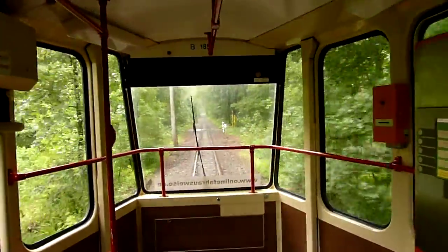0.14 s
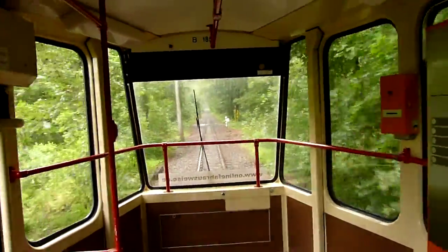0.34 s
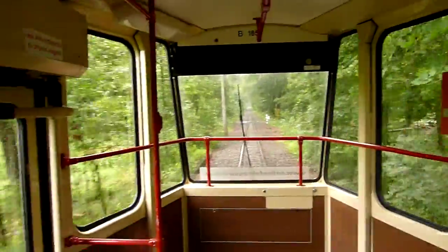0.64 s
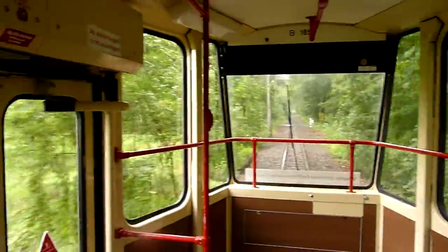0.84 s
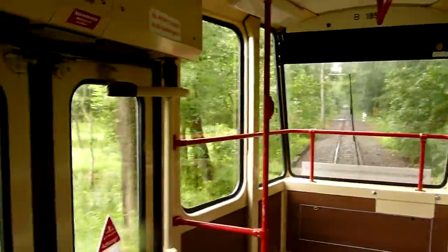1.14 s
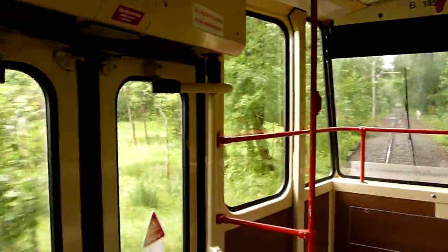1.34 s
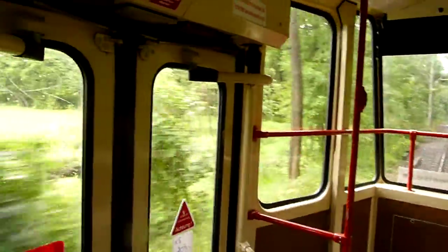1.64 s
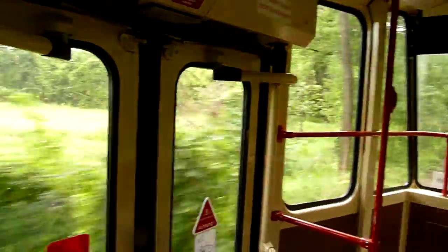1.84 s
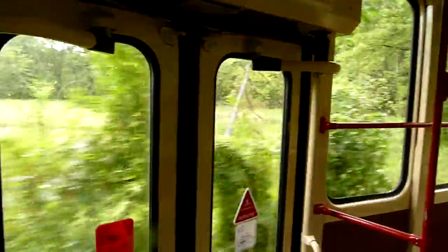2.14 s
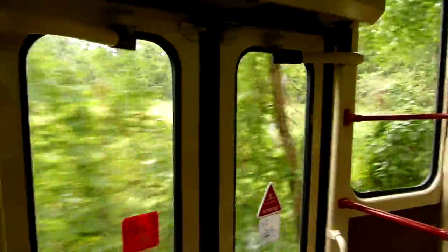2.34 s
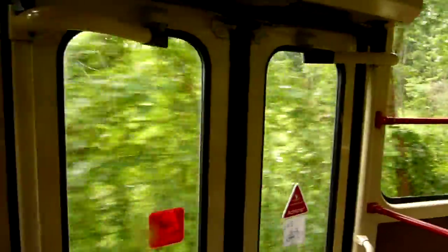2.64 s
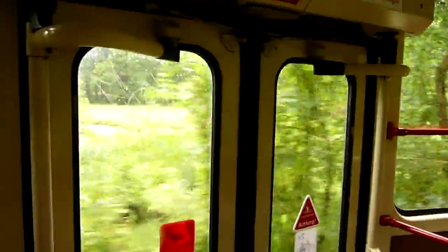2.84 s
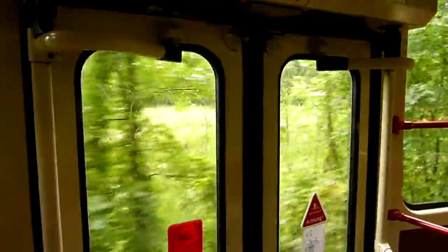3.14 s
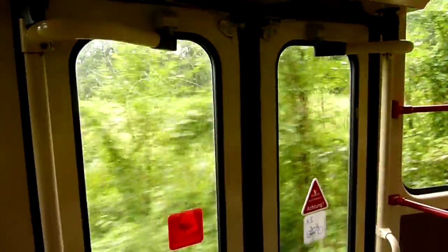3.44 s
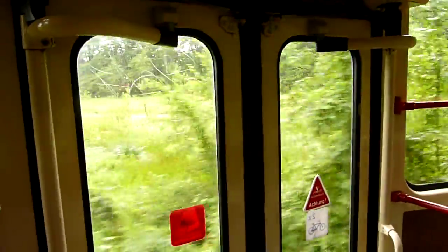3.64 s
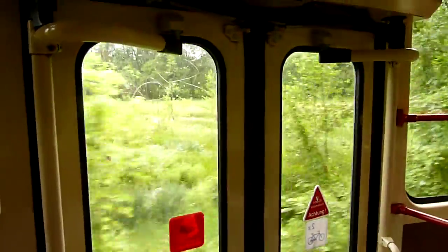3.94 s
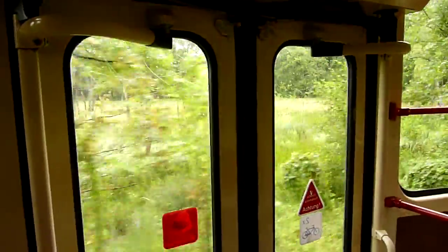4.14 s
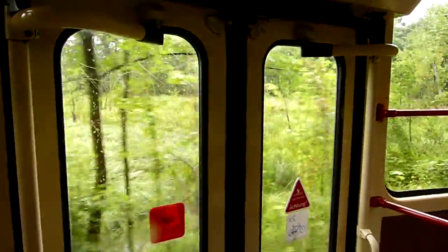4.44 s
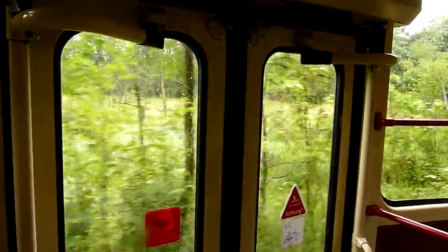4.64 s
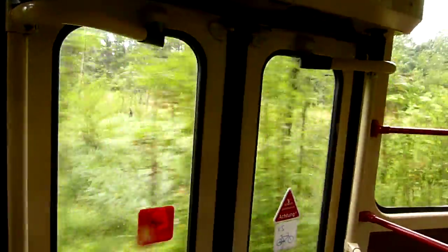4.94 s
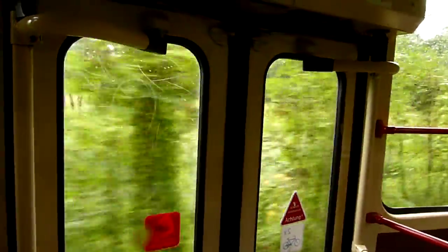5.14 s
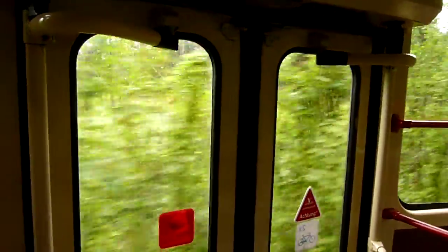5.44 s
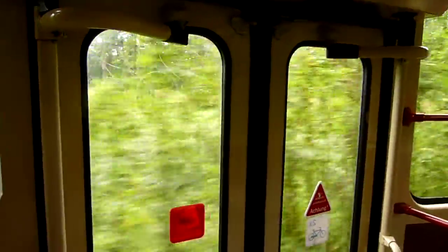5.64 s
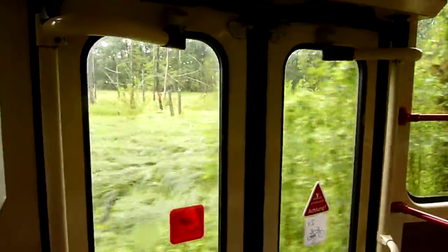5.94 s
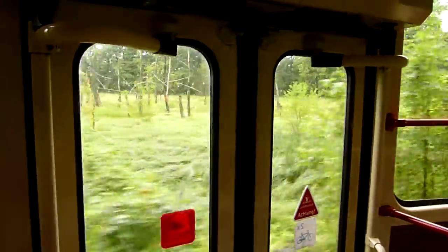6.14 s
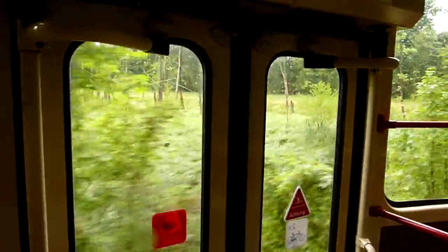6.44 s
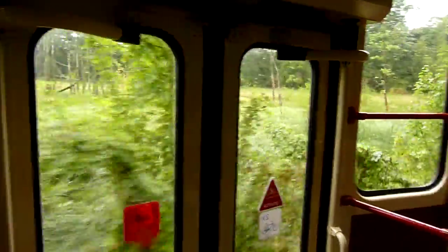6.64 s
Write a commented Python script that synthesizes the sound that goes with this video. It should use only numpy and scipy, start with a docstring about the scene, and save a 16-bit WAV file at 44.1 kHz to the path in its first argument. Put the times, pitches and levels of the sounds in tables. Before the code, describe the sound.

From 0 to about 7 seconds, an old tram rolls continuously at a steady pace, heard inside its closed car. A heavy low rumble shakes floor and panels, with a slow-moving, throbbing boom of cabin air beneath. Above it lies a muffled, fluttering rail roar and quieter wheel hiss. The roughness swells slightly around 2.7 seconds, with boom surges near 3 and small jolts near 0.8, 1.7, 2.8 and 4. Two thin, faint whines, one a little higher, come and go, clearest around 1.2, 3.7 and 5.2. At roughly 4.3 to 4.6 a short, very high metallic squeak stutters and dies. More low surges follow, near 4.7 and 6. A soft hissing scrape of metal brushes past at 5.5, then weaker ones until about 6.5. The rumble carries on to the end. The mono microphone sounds small, close and slightly dull.

```python
"""Old tram on rough rails, heard inside

Rough track shakes floor and panels: filtered noise, levelled, then driven by the track roughness.
The saloon throbs on one low air mode (narrow noise); rails roar and wheels hiss (resonant noise).
Two thin whines of the running gear come and go as wavering sines. Soft scrapes are swells of
high noise; one short squeak is a run of ringing slips.
"""
import sys
import numpy as np
from scipy import signal
from scipy.fft import rfft, irfft
from scipy.io import wavfile
from scipy.ndimage import uniform_filter1d

SR = 44100
rng = np.random.default_rng(int(sys.argv[2]) if len(sys.argv) > 2 else 0)


def store_wav(level_fs):
    """Save 16-bit WAV to argv[1]."""
    pcm = np.round(np.clip(np.atleast_2d(level_fs), -1, 1) * 32767)
    wavfile.write(sys.argv[1], SR, pcm.T.astype(np.int16))


N = 299086
TIME_S = np.arange(N) / SR
FREQ_HZ = np.fft.rfftfreq(N, 1 / SR)

# Swell lengths below run from the top to the point where the swell has fallen to exp(-2).
# Track roughness reaching the car: time_s, rumble_drive_db, rail_roar_db, wheel_ring_db
TRACK = [(0, -32, -41.5, -48), (0.85, -32.5, -41.5, -47.0), (1.2, -31.5, -40, -44),
         (1.68, -30.5, -38.5, -45.5), (1.96, -30.5, -40.5, -47.5), (2.7, -30.0, -36.5, -42),
         (3.15, -32, -37.5, -45), (3.32, -32.5, -42.5, -47.5), (3.55, -30.5, -39, -44),
         (3.95, -30.5, -38.5, -45), (4.08, -32, -40, -46.0), (4.24, -30, -39, -44.0),
         (4.42, -31.5, -40, -46.5), (4.85, -31, -39.0, -45), (5.2, -30.5, -41.5, -48),
         (5.54, -30.5, -41, -46.5), (5.66, -33.5, -43, -47.5), (6.78, -30.5, -38.5, -47.0)]
# Rail bumps shifting rumble and roar for a moment: top_s, length_s, rumble_shift_db, roar_shift_db
RAIL_BUMPS = [(.27, 0.12, .5, 1.5), (0.788, 0.057, 2.5, 0), (1.062, .09, 0.5, 0.2), (1.677, .12, 2.5, 1),
              (2.498, 0.22, -0.5, 0), (2.76, 0.083, 2, -1.5), (3.0, .12, 0.9, -1), (3.757, 0.14, 2, 0),
              (3.968, 0.081, 3.5, 4), (4.717, 0.19, 2.5, -0.2), (5.032, 0.044, 2, 1.5),
              (5.543, 0.056, -1.5, 4), (5.823, 0.094, 3, 2.5), (6.277, .14, 0.5, 1.5)]
# Vibration through the bogies into the floor, relative spectrum: freq_hz, density_db_per_hz
FLOOR_SPECTRUM = [(12, -18), (31, -12), (37, -2), (52, -3.5), (72, -5), (92, -2), (140, -2.5), (166, -5.5),
                  (290, -5.5), (410, -5.5), (445, -10), (480, -24.5), (1000, -76)]
# Floor and wall panel resonances: centre_hz, width_hz, lift_db
PANEL_MODES = [(88, 12, 2.5), (119.6, 16, 4.5), (141, 25, 3), (176.3, 16, 5.5), (201, 2.3, 5.5),
               (217, 7.7, 8), (248.3, 4.6, 4.5), (262.2, 11, 3), (295, 11, 3), (309, 16, 4.5),
               (361, 7.5, 1.5), (381.5, 11, 3)]
# Strength of the lowest air mode between surges: time_s, level_db
BOOM_LEVEL = [(0, -29.5), (.65, -34), (1.75, -33), (2.5, -35.5), (3.1, -33.5), (3.5, -37.5), (4.3, -36.5),
              (4.54, -44.5), (4.75, -33.5), (5.5, -33), (6.78, -34)]
# Surges of that mode as the car heaves: top_s, length_s, lift_db
BOOM_SURGES = [(2.95, 0.053, 7.5), (3.13, 0.053, 4), (3.28, .07, 7.5), (4.0, .05, 4.5), (4.32, 0.22, 7.5),
               (4.67, .06, 9.5), (5.08, 0.034, 3), (5.27, 0.068, 5.5), (5.6, 0.092, 3), (6.04, 0.056, 8.5)]
# Rolling noise dulled by closed doors and windows, relative spectrum: freq_hz, density_db_per_hz
ROAR_SPECTRUM = [(250, -14), (500, 0.5), (600, -0.5), (830, -3), (1080, -4.5), (1260, -8), (1600, -11),
                 (2150, -11.5), (2550, -15.5), (3250, -20), (4100, -23), (5700, -30.5), (6900, -43.5),
                 (7800, -64)]
# Broad wheel and rail resonances: centre_hz, width_hz, lift_db
WHEEL_MODES = [(560, 8.7, 6.5), (591, 9.7, 2.5), (680, 65, 2), (963, 51, 4), (1074, 34, 3.5),
               (1820, 66, 2.5), (2277, 170, 5), (2850, 210, 4.5), (3855, 420, 3)]
# Pitches of the two running-gear whines: name -> pitch_hz
WHINE_HZ = {"low": 1585, "high": 1901}
# Swells of the whines: top_s, length_s, level_db, whine_name
WHINE_SWELLS = [(0.076, 0.49, -57, "low"), (0.478, 0.13, -67, "high"), (1.226, 0.29, -51.5, "high"),
                (1.397, .15, -58, "low"), (2.6, 0.35, -59, "high"), (3.55, .12, -55.5, "high"),
                (3.708, .22, -51, "low"), (3.88, .22, -55, "high"), (4.25, 0.24, -54.5, "high"),
                (4.286, 0.33, -58, "low"), (4.882, 0.16, -56.5, "high"), (5.25, .38, -53, "low"),
                (5.857, 0.35, -59, "low"), (6.68, .2, -58.5, "high"), (6.75, 0.56, -59, "low")]
# Slips of a metal part making up the squeak: start_s, hold_s, level_db, pitch_hz
SLIPS = [(4.33, .045, -57.5, 5370), (4.378, .014, -50.5, 5365), (4.414, 0.098, -57.5, 5415),
         (4.451, .036, -48.5, 5418), (4.562, 0.047, -60, 5400)]
# Soft scrapes of rubbing metal: top_s, length_s, level_db, centre_hz, width_hz
SCRAPES = [(1.078, .08, -70, 5700, 1200), (1.29, 0.1, -74.5, 6600, 900), (3.24, .06, -69, 5600, 1590),
           (3.97, 0.087, -69, 5300, 1900), (5.54, 0.19, -54.5, 4400, 1690), (5.52, 0.12, -71, 6360, 900),
           (5.777, 0.16, -60.5, 4320, 2120), (6.057, 0.17, -60, 4800, 2290),
           (6.208, 0.07, -56.5, 4620, 2300), (6.42, 0.38, -61.5, 4670, 2100)]

BOOM_HZ, BOOM_WIDTH_HZ = 65.5, 10.5  # gain is a quarter one width off centre
WHINE_REST_DB = -61.5  # either whine between its swells
SLIP_ATTACK_S, SLIP_T60_S = 0.012, 0.21
BUMP_WHEEL_SHARE = 0.66  # part of the roar's dB shift that reaches the wheels
MIC_EDGE_HZ = 7600


def rumble(drive_db, usual_db=-31, deep_db=-0.3, panel_db=0.06,
           deep_growth=1.45, panel_growth=0.95, split_hz=270, lump_db=0.5):
    """Uneven rail shakes the floor in lumps and rings the panels; roughness lifts the deep part most."""
    deep_share = 1 / (1 + (FREQ_HZ / split_hz) ** 8)
    shaking = steadied(noise(colour(FLOOR_SPECTRUM, PANEL_MODES)), span_s=0.16)
    deep = irfft(rfft(shaking) * deep_share, N)
    panels = shaking - deep
    excess_db = drive_db - usual_db
    body = deep * gain_of(deep_db + deep_growth * excess_db)
    body = body + panels * gain_of(panel_db + panel_growth * excess_db)
    return gain_of(usual_db + lump_db * drift(rate_hz=5.2)) * body


def boom(throb_db=1.7):
    """The floor drives one narrow air mode of the saloon at random: it throbs and sometimes surges."""
    level_db, = follow(BOOM_LEVEL)
    level_db = level_db + lifts(BOOM_SURGES) + throb_db * drift(rate_hz=9)
    mode = noise(1 / (1 + ((FREQ_HZ - BOOM_HZ) / BOOM_WIDTH_HZ) ** 2) ** 2)
    return gain_of(level_db) * steadied(mode, span_s=0.21)


def roar(rail_db, wheel_db, flutter_db=0.53, hiss_flutter_db=0.51, split_hz=1450, ripple_db=0.6):
    """Rolling contact shakes rails (middle range) and wheels (treble); both flutter with the rail head."""
    # the saloon's crowded standing waves ripple the spectrum
    standing_db = ripple_db * evened(uniform_filter1d(rng.standard_normal(len(FREQ_HZ)), size=70))
    spectrum = colour(ROAR_SPECTRUM, WHEEL_MODES) * gain_of(standing_db)
    rail_share = 1 / (1 + (FREQ_HZ / split_hz) ** 8)  # of power
    rails = steadied(noise(spectrum * np.sqrt(rail_share)), span_s=0.58)
    wheels = steadied(noise(spectrum * np.sqrt(1 - rail_share)), span_s=0.59)
    rails = rails * gain_of(eased(rail_db, span_s=0.035))
    hiss_db = hiss_flutter_db * drift(rate_hz=17)
    wheels = wheels * gain_of(eased(wheel_db, span_s=0.044) + hiss_db)
    return gain_of(flutter_db * drift(rate_hz=32)) * (rails + wheels)


def whine():
    """Two thin tones of the running gear swell at their own times and sink back into the roar."""
    level = {name: gain_of(WHINE_REST_DB) for name in WHINE_HZ}
    for top_s, length_s, level_db, name in WHINE_SWELLS:
        level[name] = level[name] + gain_of(level_db) * swell(top_s, length_s)
    return sum(level[name] * tone(pitch_hz) for name, pitch_hz in WHINE_HZ.items())


def squeak(jitter_hz=12, scatter=0.58):
    """Each slip rings a high mode that dies away; wall reflections beat against it and make it stutter."""
    out = np.zeros(N)
    jitter = jitter_hz * drift(rate_hz=84)
    paths = 1 + scatter * (drift(rate_hz=78) + 1j * drift(rate_hz=55))
    for start_s, hold_s, level_db, pitch_hz in SLIPS:
        attack = np.clip((TIME_S - start_s) / SLIP_ATTACK_S, 0, 1)
        decay_db = -60 * np.maximum(TIME_S - start_s - hold_s, 0) / SLIP_T60_S
        turns = np.cumsum(pitch_hz + jitter) / SR
        slip_paths = np.roll(paths, round(start_s * SR))
        ring = (slip_paths * np.exp(2j * np.pi * turns)).real
        out += attack * gain_of(level_db + decay_db) * steadied(ring, span_s=0.056)
    return out


def scrapes():
    """Rubbing metal: each scrape is a short swell of high hiss."""
    out = np.zeros(N)
    for top_s, length_s, level_db, centre_hz, width_hz in SCRAPES:
        hiss = noise(np.exp(-2 * ((FREQ_HZ - centre_hz) / width_hz) ** 2))
        out += gain_of(level_db) * swell(top_s, length_s) * hiss
    return out


def gain_of(db):
    """Decibels to amplitude."""
    return 10 ** (np.asarray(db) / 20)


def evened(x):
    """Scales to an rms of one."""
    return x / np.sqrt(np.mean(abs(x) ** 2) + 1e-20)


def follow(table):
    """Columns of a curve table, interpolated at every sample."""
    time_s, *columns = np.transpose(table)
    return [np.interp(TIME_S, time_s, column) for column in columns]


def colour(points, modes):
    """Gain per frequency: a smooth spectrum with resonances standing on it."""
    point_hz, point_db = np.transpose(points)
    gain_db = np.interp(np.log(FREQ_HZ + 1), np.log(point_hz + 1), point_db)
    for centre_hz, width_hz, lift_db in modes:
        gain_db = gain_db + lift_db / (1 + (2 * (FREQ_HZ - centre_hz) / width_hz) ** 2)
    return gain_of(gain_db)


def noise(gain):
    """Random vibration with the given spectrum, rms one."""
    return evened(irfft(rfft(rng.standard_normal(N)) * gain, N))


def drift(rate_hz):
    """Random wandering, rms one; its spectrum falls to 1/e at rate_hz."""
    return noise(np.exp(-(FREQ_HZ / rate_hz) ** 2))


def steadied(x, span_s):
    """Divides by the local rms, taken over a sliding window of span_s."""
    window = signal.windows.hann(max(int(span_s * SR), 64))
    weight = signal.fftconvolve(np.ones(N), window, "same")
    power = signal.fftconvolve(x ** 2, window, "same") / weight
    return x / np.sqrt(abs(power) + 1e-9)


def eased(curve, span_s):
    """Rounds the corners of a control by a running mean."""
    return uniform_filter1d(curve, max(int(span_s * SR), 1), mode="nearest")


def swell(top_s, length_s):
    """Gaussian rise and fall, one at the top."""
    return np.exp(-2 * ((TIME_S - top_s) / length_s) ** 2)


def lifts(rows):
    """Sum of swells in dB from rows of top_s, length_s, lift_db."""
    return sum(lift_db * swell(top_s, length_s) for top_s, length_s, lift_db in rows)


def tone(pitch_hz, waver_hz=1.48, shimmer_db=1.6):
    """A nearly pure tone wavering in pitch and strength."""
    turns = np.cumsum(pitch_hz + waver_hz * drift(rate_hz=16.5)) / SR
    return gain_of(shimmer_db * drift(rate_hz=16)) * evened(np.sin(2 * np.pi * turns))


def scene():
    """Rolling noise driven by track and bumps, plus boom, whines, scrapes and squeak."""
    drive_db, rail_db, wheel_db = follow(TRACK)
    shake_db = lifts((top_s, length_s, db) for top_s, length_s, db, _ in RAIL_BUMPS)
    bump_db = lifts((top_s, length_s, db) for top_s, length_s, _, db in RAIL_BUMPS)
    rolling = rumble(drive_db + shake_db)
    rolling = rolling + roar(rail_db + bump_db, wheel_db + BUMP_WHEEL_SHARE * bump_db)
    return (rolling + boom() + whine() + scrapes() + squeak())[None]


def record(dry):
    """A small mono microphone with a narrow band: low-pass, ends softly faded."""
    soft_ends = signal.windows.tukey(N, 0.001)
    low_pass = signal.firwin(201, MIC_EDGE_HZ, window=("kaiser", 8), fs=SR)
    return signal.oaconvolve(dry * soft_ends, low_pass[None], "same")


dry = scene()
out = record(dry)
store_wav(out)
```